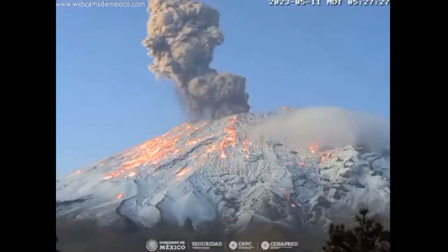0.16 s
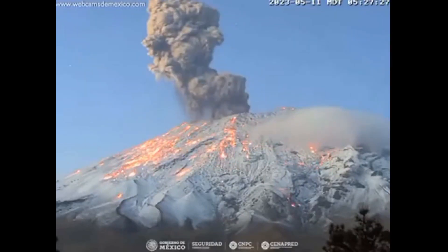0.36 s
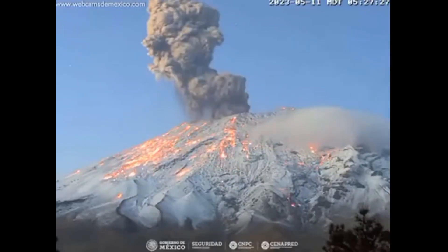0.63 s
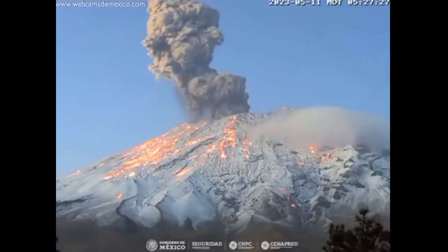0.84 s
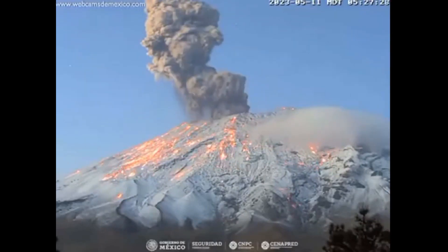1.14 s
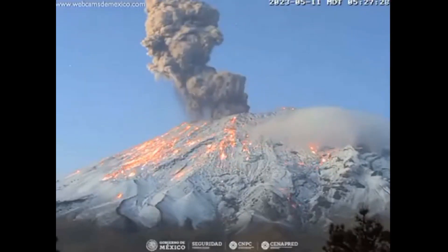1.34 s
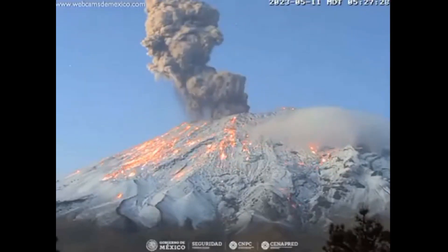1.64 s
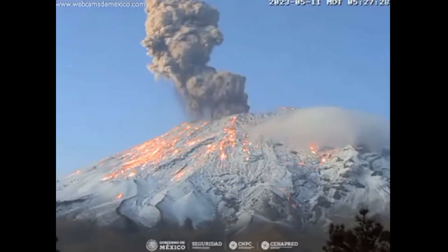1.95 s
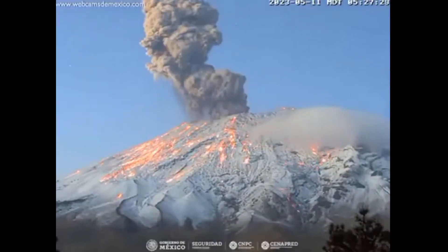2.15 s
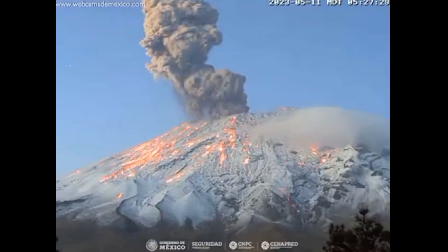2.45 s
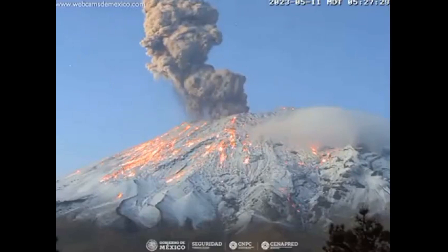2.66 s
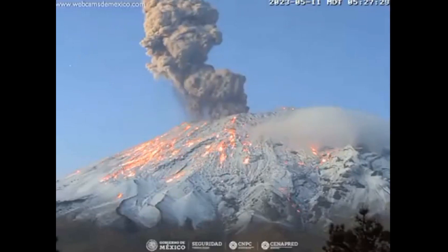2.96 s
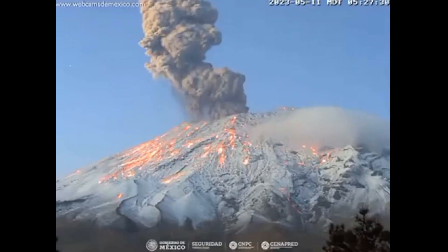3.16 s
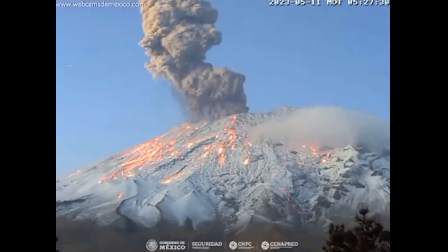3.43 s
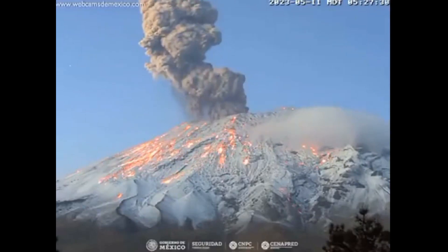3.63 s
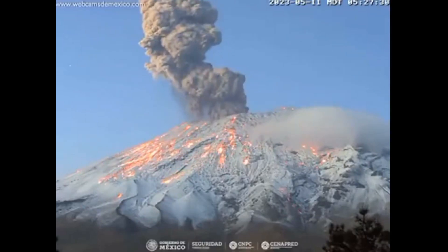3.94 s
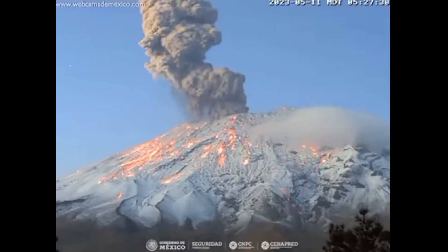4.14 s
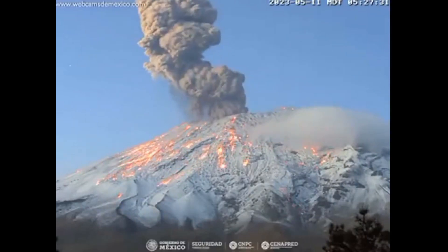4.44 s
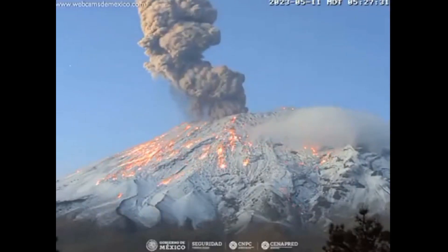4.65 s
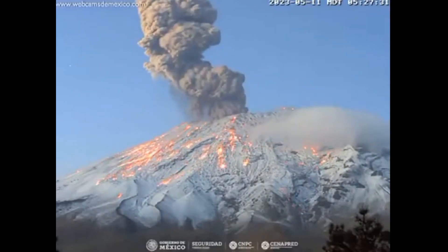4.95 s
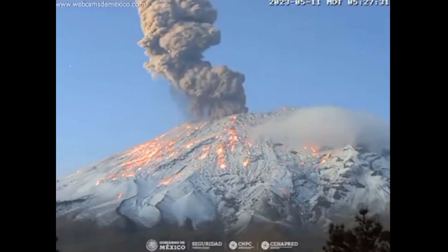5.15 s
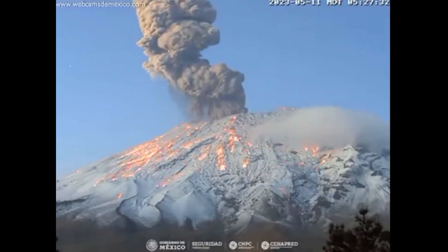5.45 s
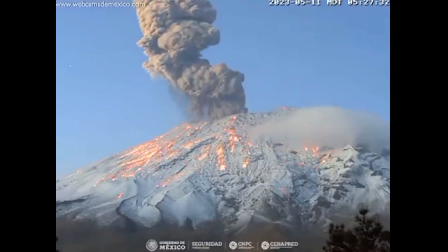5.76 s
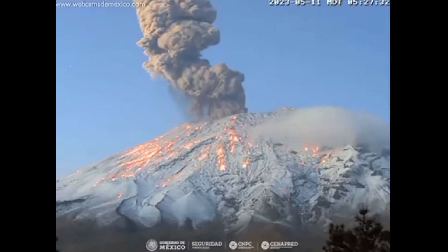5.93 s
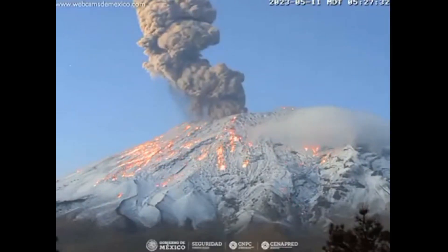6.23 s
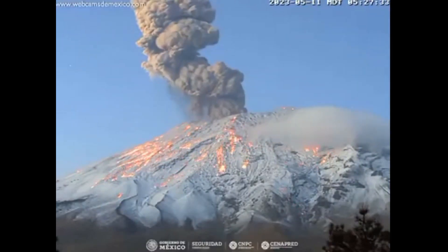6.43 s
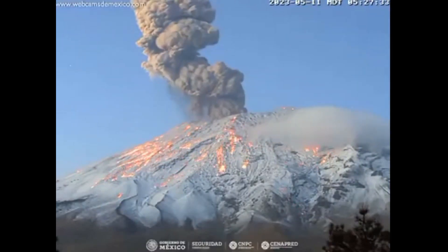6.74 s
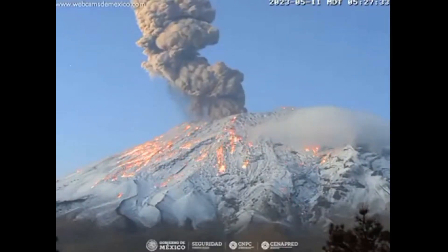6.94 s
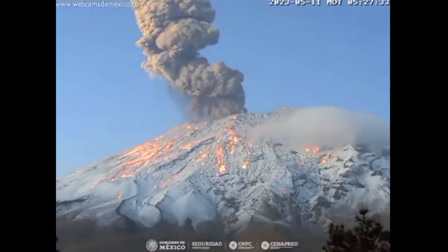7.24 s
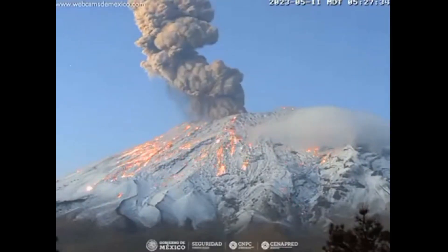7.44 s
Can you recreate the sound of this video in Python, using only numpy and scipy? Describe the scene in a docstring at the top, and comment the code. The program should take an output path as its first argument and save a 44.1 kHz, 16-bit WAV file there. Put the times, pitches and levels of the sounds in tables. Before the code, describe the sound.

Dull thuds, knocks and stony cracks come at uneven intervals as blocks from a distant eruption strike the mountainside. Two loud clusters come early, followed by lighter knocks, a heavy thud past the middle and a cracking cluster near the end. A low rumble of falling rock swells and slowly weakens underneath. The faraway microphone gives a dull tone, with slight echoes and a faint hiss.

```python
"""Thuds, knocks and cracks over a lumpy rumble: a far eruption throws blocks that burst on the slopes.
Countless smaller, farther impacts merge into the rumble; the slopes send back dull echoes.
The sound arrives through a narrow audio channel over a faint high hiss."""
import sys
import numpy as np
from scipy import signal
from scipy.fft import rfft, irfft
from scipy.io import wavfile

SR = 44100
rng = np.random.default_rng(int(sys.argv[2]) if len(sys.argv) > 2 else 0)


def output_pcm(signal):
    """Save a mono or channel-first signal as 16-bit PCM at the path in sys.argv[1].

    Samples are clipped to [-1, 1] before scaling.
    """
    pcm = np.clip(np.atleast_2d(signal).T, -1, 1) * 32767
    wavfile.write(sys.argv[1], SR, np.round(pcm).astype(np.int16))


N = 334719


def from_db(db):
    """Decibels to gain."""
    return 10 ** (np.asarray(db) / 20)


def rms_one(x):
    """Scale to rms 1."""
    return x / np.sqrt(np.mean(x ** 2) + 1e-30)


def colour(x, spectrum):
    """Shape a white signal by rows of freq_hz, gain_db on a log-frequency axis; rms 1."""
    table_hz, table_db = np.transpose(spectrum)
    bin_hz = np.maximum(np.fft.rfftfreq(len(x), 1 / SR), 1)
    gain_db = np.interp(np.log(bin_hz), np.log(table_hz), table_db)
    return rms_one(irfft(rfft(x) * from_db(gain_db), len(x)))


def band(x, low_hz, high_hz, order):
    """Band-pass; peak 1."""
    out = signal.sosfilt(signal.butter(order, [low_hz, high_hz], "band", fs=SR, output="sos"), x)
    return out / np.max(np.abs(out))


def decay(t, t60_s, hold):
    """Holds, then falls ever faster to -60 dB at t60_s (20 ms at least)."""
    return from_db(-60 * (t / max(t60_s, 0.02)) ** hold)


def drift(cutoff_hz):
    """Slow random wander; rms 1."""
    lowpass = signal.butter(2, cutoff_hz, fs=SR, output="sos")
    return rms_one(signal.sosfilt(lowpass, rng.standard_normal(N + SR))[SR:])


def stone_clicks(per_s, spread_db):
    """Random clicks of either sign, many small, a few large; rms 1."""
    sizes = from_db(spread_db * np.minimum(rng.exponential(1, N), 4)) * rng.choice([-1, 1], N)
    return rms_one(sizes * (rng.random(N) < per_s / SR) + 1e-18)


def far_rockfall():
    """Far blocks blur into rumble, small stones into clatter, under a smooth hiss."""
    # rumble envelope: time_s, level_db
    rumble_levels = [(0.0, -51), (0.51, -51.5), (0.699, -53), (0.87, -46), (1.08, -49.5), (1.48, -53.5),
                     (1.69, -44.5), (1.96, -52), (2.831, -53.5), (3.23, -55.5), (4.0, -53), (4.92, -60.5),
                     (5.28, -51), (5.64, -60.5), (6.62, -60), (6.81, -54), (7.2, -62), (7.59, -63)]
    # spectrum of far blocks: freq_hz, gain_db
    rumble_spectrum = [(20, -17), (60, -6), (93, 7), (126, 7), (200, 4.5), (270, 0), (400, -6),
                       (600, -45.5)]
    # spectrum of small stones: freq_hz, gain_db
    clatter_spectrum = [(250, -28), (440, -4), (690, 1), (1020, -7.5), (1590, -25.5), (2000, -42.5)]
    # smooth top of the roar: freq_hz, gain_db
    roar_spectrum = [(800, -12.5), (1500, -6.5), (2400, -11), (3400, -15.5)]
    clatter_db, clatter_fade_db_per_s = -58.5, 1.34
    t = np.arange(N) / SR
    blocks = stone_clicks(per_s=150, spread_db=1.5)
    stones = stone_clicks(per_s=1500, spread_db=4.0)
    spurts = drift(cutoff_hz=12.4)
    rumble = colour(blocks + 1.05 * rng.standard_normal(N), rumble_spectrum)
    rumble *= from_db(np.interp(t, *np.transpose(rumble_levels)) + 2.23 * spurts)
    clatter = colour(stones + 0.048 * blocks + 1.24 * rng.standard_normal(N), clatter_spectrum)
    clatter *= from_db(clatter_db - clatter_fade_db_per_s * t + 1.8 * spurts)
    roar_top = from_db(-79.5) * colour(rng.standard_normal(N), roar_spectrum)
    return rumble + clatter + roar_top


def slope_echoes(x):
    """The slopes scatter sound into a noise tail that dies band by band, treble first."""
    # echo decay: freq_hz, t60_s, gain_db
    echo_bands = [(57.5, 0.46, 2), (150, 0.49, -2.5), (420, 0.71, 2), (920, 0.79, -6.5), (1500, 0.42, 3),
                  (2190, 0.11, -3), (3620, 0.11, 5)]
    table_hz, table_t60_s, table_db = np.transpose(echo_bands)
    t = np.arange(SR) / SR
    edges_hz = 40 * 2.0 ** np.arange(0, 7, 0.5)
    tail = np.zeros(SR)
    for low_hz, high_hz in zip(edges_hz, edges_hz[1:]):
        bandpass = signal.butter(2, [low_hz, high_hz], "band", fs=SR, output="sos")
        log_centre = np.log(low_hz * high_hz) / 2
        t60_s = np.interp(log_centre, np.log(table_hz), table_t60_s)
        gain_db = np.interp(log_centre, np.log(table_hz), table_db)
        tail += signal.sosfilt(bandpass, rng.standard_normal(SR)) * from_db(gain_db - 60 * t / t60_s)
    tail *= 1 - np.exp(-t / 0.0015)  # first echoes take time to arrive
    return signal.fftconvolve(x, tail)[:N]


def ground_ring(t, fade, thud_hz, thud_db, knock_hz, knock_db, crack_db):
    """Struck ground dips, then rings: a sagging thud, a deep push and a shorter knock."""
    push_hz, rise_s = 50.6, 0.0019
    push_db = thud_db - 9 + 0.32 * (crack_db - thud_db)  # bursting blocks push harder
    thud = from_db(thud_db) * fade * np.sin(2 * np.pi * thud_hz * t * (1 - 1.1 * t) + 1.1)
    push = from_db(push_db) * fade * np.sin(2 * np.pi * push_hz * t)
    knock = from_db(knock_db) * fade ** 2.74 * np.sin(2 * np.pi * knock_hz * t - 0.4)
    rise = 1 - np.exp(-(t / rise_s) ** 2)  # heavy ground is slow to move
    return -rise * (thud + push + knock)


def shard_hail(t, per_s, level_db):
    """A block bursts: one unit click, then random clicks of shards."""
    hail = from_db(level_db) * rng.standard_normal(len(t)) * (rng.random(len(t)) < per_s / SR)
    hail[0] = -1
    return hail


def block_impacts():
    """Each block rings the ground and throws shards; fainter means farther, longer and duller."""
    # landings: start_s, thud_hz, thud_db, knock_db, crack_db, snap_db
    landings = [(0.01, 142, -36, -39.5, -49.5, -81), (0.191, 151, -46, -46.5, -45.5, -69),
                (0.282, 142, -38.5, -64, -49, -75), (0.325, 136, -30, -56, -67, -82),
                (0.536, 124, -39, -47.5, -61, -77.5), (0.61, 140, -42.5, -45, -42, -72),
                (0.647, 125, -23.5, -57, -48.5, -74), (0.738, 169, -28, -28, -43.5, -81),
                (0.752, 150, -46, -36, -54, -72.5), (0.897, 158, -22, -17, -27.5, -32.5),
                (0.906, 150, -31.5, -50, -25.5, -66), (0.92, 141, -34, -38, -32, -58),
                (0.939, 131, -43, -36.5, -42, -65), (1.025, 117, -37, -39.5, -36, -89),
                (1.196, 129, -33, -58, -50.5, -64), (1.221, 123, -25.5, -57, -36, -54),
                (1.374, 122, -39, -42, -58, -88), (1.55, 148, -58, -42.5, -43.5, -71),
                (1.62, 115, -21, -24, -30.5, -43.5), (1.631, 118, -40, -36, -32, -48),
                (1.644, 126, -24, -30, -29.5, -62), (1.692, 132, -44, -45, -42, -61),
                (1.717, 140, -25.5, -27, -38.5, -50.5), (1.737, 130, -36, -36.5, -49, -65),
                (1.79, 134, -50, -41, -42.5, -80), (2.111, 130, -29.5, -35.5, -32, -67),
                (2.218, 135, -35, -33, -42.5, -69), (2.32, 158, -39, -44.5, -71, -75),
                (2.586, 135, -37, -55, -48, -77), (2.873, 156, -40.5, -41.5, -52, -81),
                (3.028, 130, -32, -35, -44.5, -65), (3.43, 124, -43, -48.5, -42.5, -64),
                (3.45, 137, -38.5, -48, -47, -73), (3.592, 125, -39, -42, -41, -65),
                (3.664, 145, -46, -44.5, -50.5, -71), (3.92, 131, -41, -45.5, -52, -70),
                (3.992, 128, -28.5, -39, -44, -91), (4.049, 131, -48, -49, -46, -71),
                (4.069, 120, -37.5, -44, -43, -75), (4.229, 141, -40, -44.5, -48, -83),
                (4.312, 129, -30.5, -26.5, -32, -47), (4.42, 116, -40.5, -57, -60, -80),
                (4.668, 136.6, -37, -56, -49, -65.5), (4.761, 132, -38, -37, -44, -71),
                (4.768, 129, -61, -51.5, -43.5, -67), (5.074, 140, -54, -53, -40, -60),
                (5.083, 146, -17.5, -22, -35, -48), (5.099, 145, -19.5, -52, -53, -78),
                (5.203, 141, -52, -48, -53, -86), (5.269, 149, -34.5, -45, -64, -72),
                (5.328, 114, -32.5, -41, -40, -77), (5.444, 128, -52, -56.5, -44, -69),
                (5.541, 147.5, -43, -47, -47, -75), (5.579, 122, -45, -47, -56, -85),
                (5.824, 138, -35, -32, -41.5, -67), (6.112, 141, -48, -44.5, -52.5, -73),
                (6.675, 123, -29, -36.5, -28, -37.5), (6.686, 134, -31, -34, -32.5, -45.5),
                (6.711, 126, -25.5, -42, -45.5, -63), (6.726, 124, -37, -49, -42.5, -61),
                (6.788, 129, -40.5, -43, -61, -72), (6.822, 114, -42, -49, -50, -85),
                (6.855, 116, -44, -45, -52, -69), (7.153, 128, -47.5, -52.5, -54, -80)]
    near_db, near_ground_t60_s, near_shard_t60_s = -30, 0.047, 0.054
    mean_knock_hz, near_crack_hz, pitch_spread = 254.6, 860, 0.079
    snap_band_hz, tick_band_hz, dulling_oct_per_db = (1354, 2120), (2170, 3480), 0.012
    t = np.arange(SR // 4) / SR
    out = np.zeros(N + len(t))
    detunes = 1 + pitch_spread * rng.standard_normal((len(landings), 2))
    for landing, (knock_detune, crack_detune) in zip(landings, detunes):
        start_s, thud_hz, thud_db, knock_db, crack_db, snap_db = landing
        knock_hz = mean_knock_hz * knock_detune
        crack_hz = near_crack_hz * crack_detune * 2 ** (dulling_oct_per_db * (crack_db - near_db))
        tick_db = snap_db - 5.5 - 0.68 * (near_db - snap_db)
        ground_fade = decay(t, near_ground_t60_s * 2 ** ((near_db - thud_db) / 17.5), hold=1.5)
        shard_fade = decay(t, near_shard_t60_s * 2 ** ((near_db - crack_db) / 25.5), hold=1.37)
        ground = ground_ring(t, ground_fade, thud_hz, thud_db, knock_hz, knock_db, crack_db)
        hail = shard_hail(t, per_s=2500, level_db=-8.5)
        crack = from_db(crack_db) * band(hail * shard_fade, crack_hz / 1.95, crack_hz * 1.207, order=3)
        snap = from_db(snap_db) * band(hail * shard_fade ** 0.73, *snap_band_hz, order=2)
        tick = from_db(tick_db) * band(hail * shard_fade ** 4, *tick_band_hz, order=2)
        thud_rasp = band(rng.standard_normal(len(t)) * ground_fade, *tick_band_hz, order=2)
        thud_rasp *= from_db(thud_db - 38)  # faint high rasp, follows the thud's loudness
        out[round(start_s * SR):][:len(t)] += ground + crack + snap + tick + thud_rasp
    return out[:N]


def scene():
    """Impacts, their echoes and the far rockfall; mono."""
    impacts = block_impacts()
    return (impacts + from_db(-42.5) * slope_echoes(impacts) + far_rockfall())[None]


def record(dry):
    """Narrow channel with thin bass, then a faint high hiss, then a steep top cut."""
    # faint high hiss, peak near 8.4 kHz, notch near 9.8 kHz: freq_hz, gain_db
    hiss_spectrum = [(1000, 0.5), (3800, -1), (7560, -3), (8410, 4), (9350, -9.5), (9810, -19.5),
                     (10300, -4), (10800, -0.5), (15100, -2), (15700, -1)]
    bass_cut_hz, channel_stop_hz, top_stop_hz, hiss_db = 28, 3850, 15900, -82
    narrow = signal.sosfilt(signal.cheby2(14, 45, channel_stop_hz, fs=SR, output="sos"), dry)
    narrow = signal.sosfilt(signal.butter(2, bass_cut_hz, "high", fs=SR, output="sos"), narrow)
    hiss = from_db(hiss_db) * colour(rng.standard_normal(N), hiss_spectrum)
    return signal.sosfilt(signal.cheby2(24, 40, top_stop_hz, fs=SR, output="sos"), narrow + hiss)


dry = scene()
out = record(dry)
output_pcm(out)
```